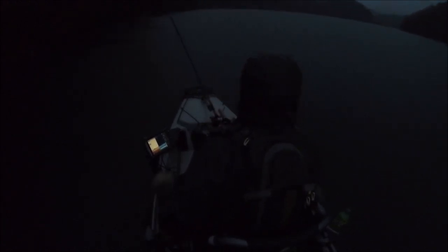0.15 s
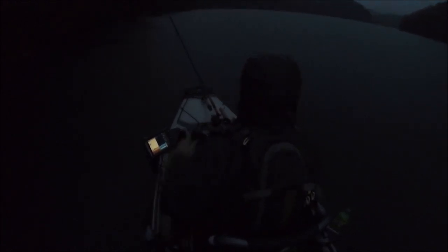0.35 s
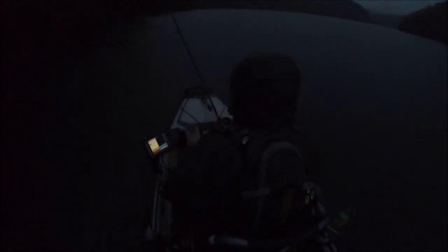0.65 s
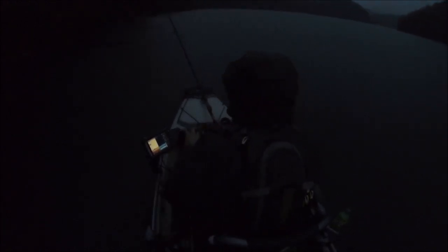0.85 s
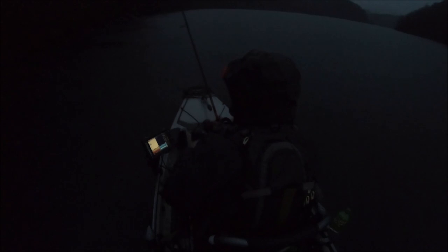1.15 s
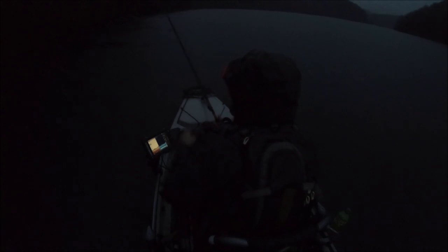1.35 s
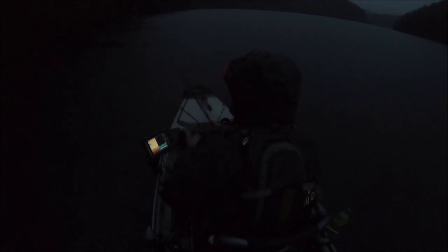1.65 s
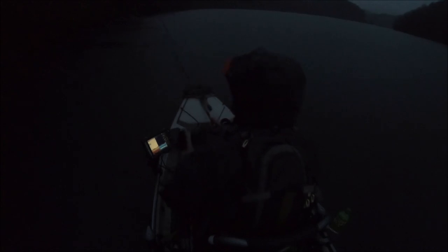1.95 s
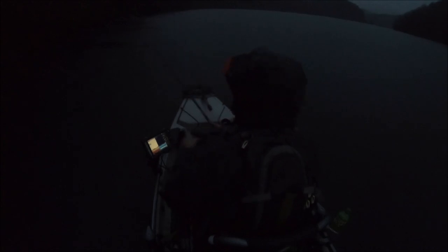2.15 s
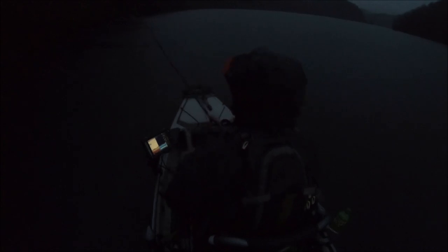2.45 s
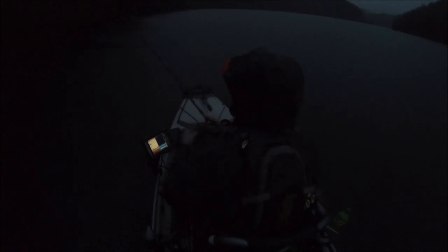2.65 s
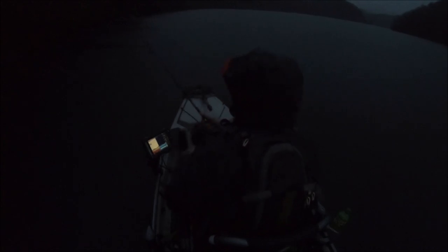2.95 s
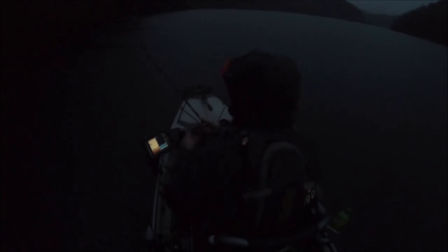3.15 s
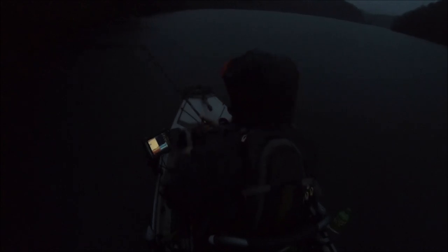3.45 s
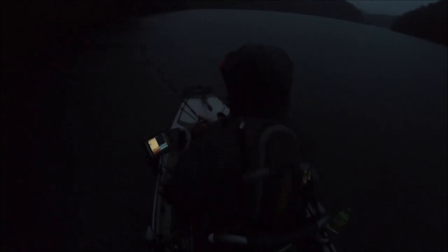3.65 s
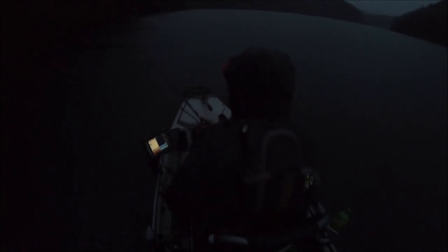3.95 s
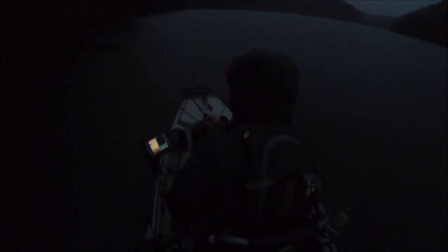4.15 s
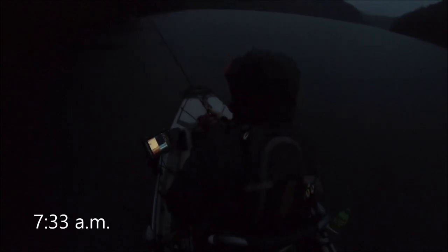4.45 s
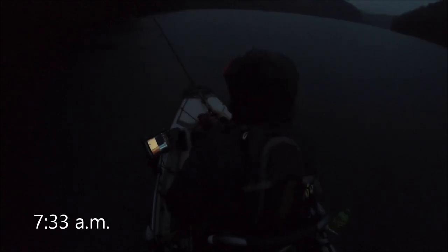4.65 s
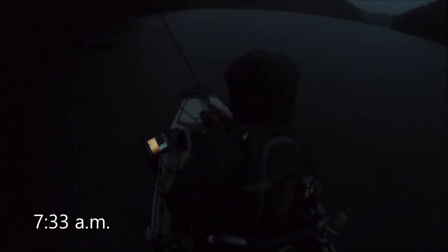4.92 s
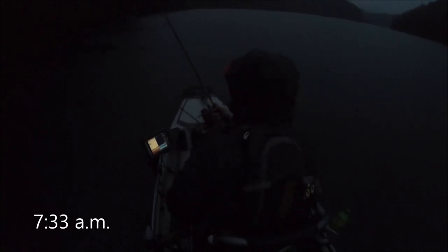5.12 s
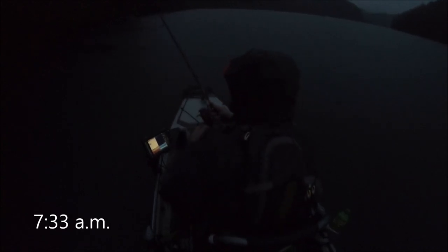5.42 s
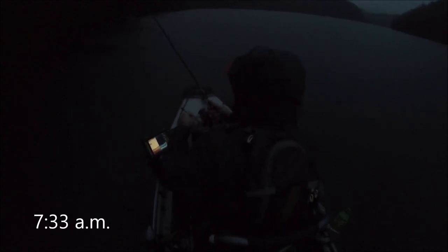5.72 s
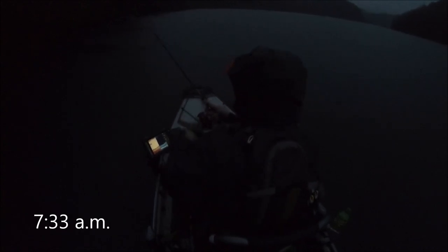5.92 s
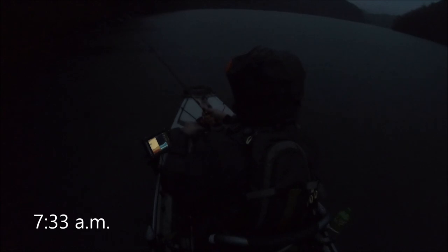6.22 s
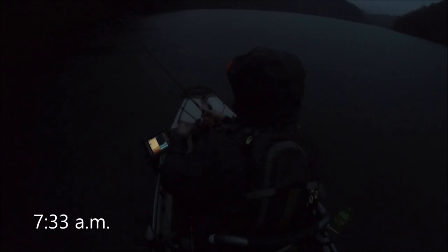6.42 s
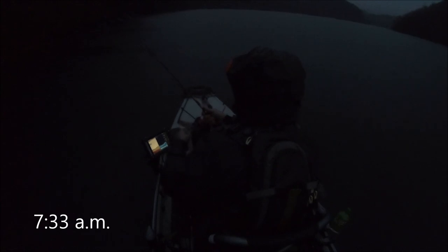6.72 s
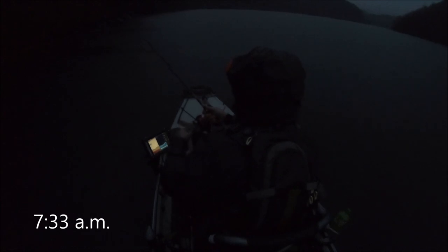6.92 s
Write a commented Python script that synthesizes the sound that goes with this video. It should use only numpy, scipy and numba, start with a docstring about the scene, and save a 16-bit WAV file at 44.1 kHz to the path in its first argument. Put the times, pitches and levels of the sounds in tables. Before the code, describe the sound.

Steady, gentle rain falls on a lake throughout, a soft wide hiss mixed with fine patter and countless tiny rising plips. The microphone is wrapped in plastic on a boat, so drops hitting the wrap sound extremely close, short and dry. A very loud smack comes at about 0.07 s; the rain is pushed down and creeps back. Crisp ticks and pops follow at 0.5, 0.8, 1.2 and 2.1 s, with lighter taps between. At 3.1 s another overloaded smack, heavier to the left, leaves a short low rumble. Small taps scatter until sharp pops at 5.1 to 5.3 s. The heaviest blow lands at 5.77 s, blunt and clipped, with a deep thump and faint dull stutters just ahead. More pops cluster at 6.1, 6.4 and 6.7 s, then rain alone recovers to 7 s. Faint hull bumps, bright spray clicks and occasional bubbles run underneath.

```python
"""Rain on a lake, under plastic wrap

Steady rain (noise bands, random drops, small bubbles) heard from a boat through the wrap around a camera.
Drops on the wrap are short blows that ring modes and splash; the three heaviest have a rumble after them;
faint dull copies, a recording artifact, stutter ahead.
Spray clicks, hull bumps and bubbles are short swelling sines.
Loud drops overload the recorder; its limiter ducks everything and lets the rain creep back.
"""
import sys
import numpy as np
from scipy import signal
from scipy.fft import rfft, irfft
from scipy.io import wavfile
from scipy.ndimage import uniform_filter1d
from numba import njit

SR = 44100
rng = np.random.default_rng(int(sys.argv[2]) if len(sys.argv) > 2 else 0)


def store_wav(level_fs):
    """Save 16-bit WAV to argv[1]."""
    pcm = np.round(np.clip(np.atleast_2d(level_fs), -1, 1) * 32767)
    wavfile.write(sys.argv[1], SR, pcm.T.astype(np.int16))


N = 312228

# All event peak levels are ahead of the limiter.
# Rain spectrum, relative: f/Hz, level/dB per Hz
RAIN_SPECTRUM = [(18, -46), (30, -10), (86, -30.5), (106, -36), (141, -5), (215, 0), (295, -3.5), (374, -2),
                 (520, -4), (866, -4), (1600, 0), (2980, -0.5), (4400, -10.5), (6380, -19), (8300, -20.5),
                 (10300, -27.5), (11800, -40), (14000, -43.5), (16000, -66)]
# Likeness of left and right rain: f/Hz, correlation/0-1
RAIN_LIKENESS = [(60, 0), (130, 0.6), (290, 0.92), (640, 0.9), (1410, 0.2), (3100, 0.89), (5000, 0.4),
                 (6800, 0), (15000, 0.3)]
# Separate drops in the rain: f/Hz, power share/0-1
PATTER_SHARE = [(100, 0.18), (300, 0.7), (1000, 0.3), (3000, 0.31), (8000, 0.9)]
# Quick level flicker of the rain: f/Hz, depth/dB
RAIN_FLICKER = [(100, 1.5), (1000, .8), (4000, 1), (8000, 1.7), (12000, 2.2)]
# Drops on the wrap: t/s, peak level/dB, main pitch f/Hz, treble gain/dB, left minus right/dB,
# bass gain/dB, right port delay/ms, blow width/cycles (floor 0.1), blow gain/dB, snap gain/dB,
# fall below main pitch/dB per octave, ring length/factor
WRAP_DROPS = [(0.0447, -21.5, 4000, -31, -1.5, -41, -0.024, 1, 7, -2, 6, 1),
              (0.0668, 26.5, 1022, -47, -2, -16, -0.12, 0.55, 7.5, 3, 3, 0.97),
              (.087, -27, 3300, -20, -2, -35, .02, 0.24, 11, -8, -3, 1.3),
              (0.5257, -11.5, 2960, -11, -6, -39, 0.05, 0.33, 4.5, 11, 9, 0.37),
              (0.6952, -27.5, 2840, -17, -3.5, -35, 0, 0.49, 7.5, 12, 15, 1.3),
              (0.767, -30, 2460, -35, -2, -32, .02, 0.57, 10, -3, 11, 1.2),
              (0.8291, -3, 1237, -32.5, 2, -31.5, 0.47, 0.36, 4, -3.5, 14, 0.92),
              (1.1066, -26, 2930, -21.5, 2, -37, 0, 0.31, 13, 4, 18, 1.1),
              (1.1578, -32, 2200, -33, 1, -35, 0.052, .26, 11, -2, 8, 1.1),
              (1.1874, 2.5, 2120, -22.5, -6, -45, -0.29, 0.42, 8, -11, 17, 0.88),
              (1.665, -25, 1780, -29, 11, -34, 0.21, 0.36, 13, -2, 0, 1.1),
              (1.825, -41, 2350, -23, -6, -32, .02, .3, 4, 0, 8, 1.1),
              (2.072, -4, 2200, -23, 0.5, -27, -0.14, 0.34, 13, 7, 6.5, 1),
              (2.1784, -34, 2120, -32, -7, -30, 0.16, .25, -4, 0, 8, 1.1),
              (2.4026, -28.5, 690, -21, -0.5, -23, 0, .3, -4, 0, 19, 0.81),
              (2.8745, -19.5, 3050, -10, -5.5, -38, -0.051, 0.17, 0.5, 11, 10, 0.88),
              (2.9155, -25, 563, -21, 1, -28, 0.4, 0.39, 5, -5, 8, 1.2),
              (2.9738, -28.5, 2720, -24, 3, -28, 0.02, .3, -2, 6, 8, 1.6),
              (3.1102, 30, 930, -58, 12, -17.5, -0.35, 0.44, 9.5, -3.5, 20, 0.86),
              (3.135, -31, 3510, -25, 3, -36, .02, 0.28, 8, -1, 8, 0.81),
              (3.1585, -23, 1483, -30, 9, -30, 0.11, 0.19, 10, -1, 6, .9),
              (3.2846, -23, 1275, -25, -3.5, -22, -0.048, 0.29, 2, 6.5, 2, 1.3),
              (3.451, -40.5, 1320, -20.5, 2, -25, 0.11, 0.13, 8, -4, -2, 0.64),
              (3.9583, -27, 2800, -14, -4, -21, -0.02, 0.42, 5, 6, 8, 0.92),
              (4.046, -30.5, 2770, -25, -15, -31, 0.047, .3, 2, 10, 12, 1.1),
              (4.3764, -33, 2820, -34, -3, -33, .02, 0.43, -4, 4, 13, 1.7),
              (4.588, -42, 2620, -24, 3, -23, 0.33, 0.25, 12, 0, 8, 1.1),
              (4.767, -33, 1163, -36, -3, -21, .02, 0.68, 7, -4, 8, 1.4),
              (4.914, -35, 2480, -25, 1, -38, 0.018, .23, 11, -3, 8, 1),
              (5.1161, -12, 2430, -10.5, -0.5, -38, 0, 0.073, 4, 7, 7, 0.89),
              (5.1695, -23, 1680, -21, 3, -19, 0.079, 1, 8.5, 2, 2.5, 1.3),
              (5.1998, -30, 830, -13, -1, -33, 0, 0.51, 15, 11, 8, 1.1),
              (5.2455, 3, 1487, -29.5, 6.5, -23.5, -0.32, 0.31, -1, -20.5, 3.5, 0.66),
              (5.3397, 3, 1483, -30, 8.5, -30.5, 0.33, 0.39, 11.5, -12.5, 18, 1.17),
              (5.4362, -29, 3200, -36, 1, -28, 0.012, 0.35, 11, -3, 8, 1.1),
              (5.768, 45, 713, -69, 9.5, -8, -0.24, 0.42, 12, -8, -3.5, 1.14),
              (6.0935, -4, 1650, -27.5, 6, -37, -0.084, 0.28, -1, -10, 8.5, 1.04),
              (6.3642, 4.5, 498, -43.5, 6, -16.5, -0.24, 0.47, 5.5, -6, 12.5, 0.75),
              (6.3895, 0.5, 1460, -31, 9, -36, 0.43, 0.37, 6, -4.5, 14, 1.3),
              (6.422, -17, 786, -38, -7, -18, -0.65, 0.21, 12.5, -14, 7, 1.6),
              (6.7136, -13.5, 1488, -31, 17, -34, -0.063, 0.35, 8, -4, 9, 0.94)]
# Modes of wrap and housing, before each drop's retuning and scaling: f/Hz, level/dB, t60/s
WRAP_MODES = [(151, 9, 0.037), (345, 5, 0.032), (508, -1.5, 0.014), (806.5, 2, 0.012),
              (1008.5, -2.5, 0.003), (1341.3, -2, 0.0097), (1650, -0.5, 0.007), (2139, 0, 0.007),
              (2782, -2.5, 0.0053), (3200, -5.5, 0.002), (4000, -11.5, 0.0065), (5000, 14, 0.00084),
              (6880, 5.5, 0.0024), (8650, 6.5, 0.0028), (11000, -25, .003), (14060, -30.5, .002)]
# Bumps through the hull: t/s, peak level/dB before panning, f/Hz, swell/cycles
HULL_BUMPS = [(0.248, -33, 383, 0.26), (0.3137, -43.5, 314, 0.95), (0.6676, -47, 423, 0.91),
              (.799, -43, 330, 0.95), (1.158, -40, 840, 0.85), (1.397, -40, 367, 0.79),
              (2.021, -47, 398, 0.88), (2.152, -46, 370, .8), (2.3023, -31.5, 278, 0.186),
              (2.979, -44, 370, 1), (3.025, -41.5, 530, 1), (3.4855, -42, 325, 0.71),
              (3.556, -40, 715, 0.83), (3.985, -47.5, 320, 0.65), (4.247, -46.5, 300, 0.97),
              (4.68, -51, 364, 0.85), (4.931, -40, 560, 0.55), (5.502, -44.5, 560, 0.47),
              (5.6797, -41, 367, 0.51), (6.232, -43, 316, 0.89)]
# Spray on nearby gear: t/s, peak level/dB before panning, f/Hz
GEAR_SPRAY = [(.356, -54, 6860), (0.445, -40, 4580), (.722, -57, 7800), (.8116, -61, 6000),
              (.926, -50, 7580), (1.085, -52, 7000), (1.405, -56, 8200), (1.7554, -50, 5500),
              (1.784, -46, 7600), (1.952, -36, 8140), (2.3111, -54, 6000), (2.5154, -47, 8180),
              (3.8028, -60.5, 8700), (3.885, -53, 8150), (3.957, -55, 8200), (4.0791, -38.5, 7700),
              (4.2476, -44.5, 7300), (4.351, -45, 4500), (4.592, -48, 6360), (4.844, -52, 10300),
              (4.9968, -47, 5800), (5.1473, -47, 8400), (5.3136, -39, 4640), (5.366, -54, 4300),
              (5.574, -52, 5400), (7.0396, -48, 6500)]
# Bubbles in the water: t/s, peak level/dB, initial f/Hz, swell/cycles, glide/share (final rise is twice this)
LAKE_BUBBLES = [(0.611, -37, 1570, 3.5, 0.074), (1.652, -43, 1760, 4.2, 0.074), (1.698, -45, 2800, 6, .08),
                (1.912, -47, 4200, 11, .08), (5.535, -43.5, 2160, 5.5, 0.08), (6.106, -46, 873, 5.9, 0.56)]

RAIN_RMS_DB, RAIN_RIGHT_DB = -48.5, 0.92  # right gain is on top
PLIP_DB, PLIP_HZ, PLIP_CYCLES = -53, 2702, 5
BASS_HZ, SNAP_HZ, TREBLE_HZ = 400, 2300, 4500  # mode group edges
SLOPE_DB_PER_OCT, SLOPE_PER_DB = 1, 0.01  # fall above main pitch; drops over 0 dB are duller
BASS_PAN_DB, LOW_CUT_HZ = 4, 150
LEAD_CYCLES = 2  # the dent builds up before the modes ring
SPLASH_HZ, SPLASH_OCTAVES = 1200, 3.6
HEAVY_DB, JOLT_FROM_DB, JOLT_DB = 10, 35, -24.5
STUTTER_S, STUTTER_DB, STUTTER_STEP_DB = 0.0107, -45.5, -12
BUMP_PAN_DB, FAINT_BUMP_DB, FAINT_BUMP_HZ = 2.5, -49, 310
SPRAY_PAN_DB = -12.5
RUMBLE_CUT_HZ, TOP_HZ = 42, 16200


def undb(db):
    """dB to amplitude factor."""
    return 10 ** (np.asarray(db) / 20)


def unit(x):
    """Scale to unit RMS."""
    return x / np.sqrt(np.mean(x ** 2))


def over_hz(table, hz):
    """Read a (f/Hz, value) table on a log-frequency axis."""
    table_hz, value = np.array(table).T[:2]
    return np.interp(np.log(hz), np.log(table_hz), value)


def highpass(x, hz):
    """Second-order low cut."""
    return signal.sosfilt(signal.butter(2, hz, "high", fs=SR, output="sos"), x)


def band(x, hz, octaves):
    """Band-pass around a centre."""
    edges_hz = hz * 2. ** (np.array([-octaves, octaves]) / 2)
    edges_hz = np.minimum(edges_hz, .45 * SR)
    return signal.sosfilt(signal.butter(2, edges_hz, "band", fs=SR, output="sos"), x)


def walk(rate_hz):
    """Random levels held 1 / rate_hz s and slewed twice; spread near 1."""
    k = int(SR / rate_hz)
    steps = np.repeat(rng.standard_normal(N // k + 1), k)
    return 1.3 * uniform_filter1d(uniform_filter1d(steps, k), k)[:N]


def add(out, s, sound, db, pan_db):
    """Place a two-channel sound at s, peak-normalised to db, then panned."""
    i = int(s * SR)
    sound = sound[:, :N - i] / np.abs(sound).max()
    side_db = np.array([[pan_db], [-pan_db]]) / 2
    out[:, i:i + sound.shape[1]] += sound * undb(db + side_db)


def grain(hz, cycles, glide=0):
    """Sine whose envelope peaks after `cycles` cycles, then dies; glide raises the pitch as it goes."""
    u = np.arange(int(8 * cycles * SR / hz)) * hz / SR
    envelope = u / cycles * np.exp(-u / cycles)
    tone = np.sin(2 * np.pi * u * (1 + glide * u / (8 * cycles)))
    return np.tile(envelope * tone, (2, 1))


def faint(db, hz, count, spread_db=3, spread_octaves=0.31):
    """Weak events at random moments: rows of t/s, peak level/dB, f/Hz."""
    place = rng.random(count)
    level, pitch = rng.standard_normal((count, 2)).T
    return np.transpose([place * (N - 1) / SR, db + spread_db * level, hz * 2 ** (spread_octaves * pitch)])


def patter(per_s, spread_db, most=12000):
    """Impulses of random moment and size; independent signs in the two rows, used as mid and side."""
    place, keep = rng.random(most), rng.random(most)
    size, sign = rng.standard_normal(most), rng.standard_normal((2, most))
    out = np.zeros((2, N))
    kept = keep < per_s * N / SR / most
    out[:, (place * N).astype(int)] = sign * undb(spread_db * size) * kept
    return unit(out)


def rain(drops_per_s_at_2khz=900, spread_db=4):
    """Half-octave bands of hiss plus separate drops; neighbouring bands share their drops."""
    out, swell = 0, walk(0.31)
    f = np.arange(N // 2 + 1) * SR / N + 1
    spectrum = undb(over_hz(RAIN_SPECTRUM, f))
    for count, hz in enumerate(32 * 2 ** np.arange(0, 9.1, .5)):
        if count % 4 == 0:
            hiss = rfft(rng.standard_normal((2, N)))
            # low thuds are rarer than high ticks
            drops = rfft(patter(drops_per_s_at_2khz * (hz / 2000) ** .4, spread_db))
            flicker = walk(22)
        share = np.clip(over_hz(PATTER_SHARE, hz), 0, 1)
        alike = np.clip(over_hz(RAIN_LIKENESS, hz), 0, 1)
        # neighbouring windows add up to one
        window = np.cos(np.pi * np.clip(np.log2(f / hz), -.5, .5)) ** 2
        mix = np.sqrt(1 - share) * hiss + np.sqrt(share) * drops
        mid, side = irfft(mix * window * spectrum, N)
        flutter = undb(0.27 * swell + over_hz(RAIN_FLICKER, hz) * flicker)
        stereo = np.sqrt(1 + alike) * mid + np.sqrt(1 - alike) * side * np.array([[1], [-1]])
        out = out + flutter * stereo
    return unit(out) * undb(RAIN_RMS_DB + np.array([[0], [RAIN_RIGHT_DB]]))


def plips():
    """Countless small bubbles on the lake: faint rising sines, randomly panned."""
    out = np.zeros((2, N))
    events = faint(PLIP_DB, PLIP_HZ, count=500, spread_octaves=.35)
    for (s, db, hz), pan in zip(events, rng.standard_normal(500)):
        add(out, s, grain(hz, PLIP_CYCLES, 0.13), db, 4 * pan)
    return out


def drop(hz, treble_db, pan_db, bass_db, lag_ms, width, blow_db, snap_db, under_db, length, slope_db,
         slack=0.027, scatter_db=1.2, push_cycles=1.08, splash_db=-24, splash_t60_s=0.03):
    """A blow dents the wrap, rings modes near its pitch and splashes; the bending wave reaches one port first."""
    f, db, t60 = np.transpose(WRAP_MODES)[:, :, None]
    early = np.arange(3000) / SR - LEAD_CYCLES / hz
    t = np.maximum(early, 0)

    middle = (f > BASS_HZ) & (f < TREBLE_HZ)
    fall_db = np.where(f > hz, slope_db, under_db) * np.abs(np.log2(f / hz))
    outer_db = np.where(f < BASS_HZ, bass_db, treble_db)
    db = db + np.where(middle, -fall_db, outer_db)
    db = db + snap_db * (middle & (f > SNAP_HZ))  # a taut spot snaps more brightly

    # the loose wrap is tuned by where it is hit
    nearest_hz = f[np.argmin(np.abs(np.log(f / hz)))]
    tension = np.where(middle & (f < SNAP_HZ), hz / nearest_hz, 1)
    shift, *scatter, turn = rng.standard_normal((len(WRAP_MODES), 4)).T[:, :, None]
    mode_hz = f * tension * (1 + slack * shift)
    # neighbouring modes swing in opposite senses, which fills the gaps between them
    sense = (-1.) ** np.arange(len(WRAP_MODES))[:, None]

    splash = band(rng.standard_normal((2, len(t))), SPLASH_HZ, SPLASH_OCTAVES)
    splash = splash * np.exp(-np.log(1000) * t / splash_t60_s)
    sound = []
    for side, own, spatter in zip((1, -1), scatter, splash):
        delay_s = max(-side * lag_ms, 0) / 1000
        late = np.maximum(t - delay_s, 0)
        u = np.where(f > BASS_HZ, late, t)  # the housing carries the bass the same way for every drop
        side_db = side * np.where(f > BASS_HZ, pan_db, BASS_PAN_DB) / 2
        decay = np.exp(-np.log(1000) * np.maximum(u - push_cycles / hz, 0) / (t60 * max(length, .3)))
        phase = 0.37 * side * turn * (f > BASS_HZ)
        ring = sense * decay * np.sin(2 * np.pi * mode_hz * u + phase)
        modes = np.sum(undb(db + side_db + scatter_db * own) * ring, axis=0)
        rise = np.minimum(late * hz / push_cycles, 1) ** 2  # the water spreads over about a cycle
        cycle = (early - delay_s) * hz - push_cycles
        blow = -np.exp(-(cycle / max(width, .1)) ** 2 / 2) * np.cos(2 * np.pi * cycle)
        wet = rise * (modes + undb(splash_db) * spatter)
        sound.append(wet + undb(blow_db + side * pan_db / 2) * blow)
    return highpass(sound, LOW_CUT_HZ)


def stutter_ahead(out, start_s, sound, db):
    """Recording artifact: faint dull copies at even steps ahead of a heavy drop."""
    dull = band(band(sound, 760, 1.1), 760, 1.1)
    dull = dull + undb(2) * band(sound, 170, 1.4) + undb(-3) * band(sound, 380, 1.0)
    dull /= np.abs(dull).max(axis=1, keepdims=True)  # as strong left as right
    for k in range(4):
        ahead_s = .0008 + (k + 1) * STUTTER_S
        add(out, start_s - ahead_s, dull, db + STUTTER_DB + k * STUTTER_STEP_DB, 0)


def heavy_rumble(out, s, db, rumble_db=-62, rumble_t60_s=0.36):
    """A low band of decaying noise follows a heavy drop."""
    t = np.arange(SR // 2) / SR
    rumble = band(rng.standard_normal(len(t)), 200, 0.85) * np.exp(-np.log(1000) * t / rumble_t60_s)
    add(out, s, np.tile(rumble, (2, 1)), db + rumble_db, 0)


def mount_jolt(out, s, after_db=28):
    """The heaviest drop jolts the mount: two low swells start ahead of it, a deeper, louder one with it."""
    add(out, s - .017, grain(77.0, cycles=0.94), JOLT_DB, 18)
    add(out, s - .012, grain(140, cycles=1.5), JOLT_DB + 10, 4)
    add(out, s, grain(44, cycles=0.51), JOLT_DB + after_db, 18)


def wrap():
    """All listed drops on the wrap; heavy ones with stutter and rumble, the heaviest with the jolt."""
    out = np.zeros((2, N))
    for s, db, hz, *colour in WRAP_DROPS:
        slope_db = SLOPE_DB_PER_OCT + SLOPE_PER_DB * max(db, 0)
        sound = drop(hz, *colour, slope_db)
        start_s = s - LEAD_CYCLES / hz
        add(out, start_s, sound, db, 0)
        if db > HEAVY_DB:
            stutter_ahead(out, start_s, sound, db)
            heavy_rumble(out, s, db)
        if db > JOLT_FROM_DB:
            mount_jolt(out, s)
    return out


def bumps():
    """Soft thuds through the hull: low sines swelling within a cycle, plus faint random ones."""
    out = np.zeros((2, N))
    for s, db, hz, cycles in HULL_BUMPS:
        add(out, s, grain(hz, cycles), db, BUMP_PAN_DB)
    for s, db, hz in faint(FAINT_BUMP_DB, FAINT_BUMP_HZ, count=30):
        add(out, s, grain(hz, cycles=0.7), db, 0)
    return out


def spray():
    """Fine spray on nearby gear: bright clicks, short sines narrowed to an octave."""
    out = np.zeros((2, N))
    for s, db, hz in GEAR_SPRAY:
        add(out, s, band(grain(hz, cycles=1.6), hz, 1.0), db, SPRAY_PAN_DB)
    return out


def bubbles():
    """Bubbles in the water: swelling sines whose pitch rises as they go."""
    out = np.zeros((2, N))
    for s, db, hz, cycles, glide in LAKE_BUBBLES:
        add(out, s, grain(hz, cycles, glide), db, 0)
    return out


def scene():
    """Sum of all sources."""
    return rain() + plips() + wrap() + bumps() + spray() + bubbles()


@njit
def limiter_db(over_db, attack, quick, slow, share):
    """Gain cut/dB: chases the overload fast, returns at a steady rate, and a share of it lingers."""
    cut, fast, rest = np.empty(len(over_db)), 0., 0.
    for i in range(len(over_db)):
        if over_db[i] > fast:
            fast = fast + attack * (over_db[i] - fast)
        else:
            fast = max(fast - quick, 0.)
        rest = max(rest - slow, share * fast)
        cut[i] = max(fast, rest)
    return cut


def record(dry, knee_db=-13, attack_s=0.00088, ahead_s=0.00039, quick_db_s=125, slow_db_s=7.5,
           linger=0.3, ceiling=0.716):
    """Limiter on the louder channel with slight look-ahead; the excess clips; lowest bass and top are cut."""
    over_db = 20 * np.log10(np.abs(dry).max(axis=0) + 1e-9) - knee_db
    attack = 1 - np.exp(-1 / (attack_s * SR))
    cut_db = limiter_db(over_db, attack, quick_db_s / SR, slow_db_s / SR, linger)
    cut_db = np.interp(np.arange(N) + ahead_s * SR, np.arange(N), cut_db)
    held = np.clip(dry * undb(-cut_db), -ceiling, ceiling)
    held = highpass(held, RUMBLE_CUT_HZ)
    return signal.sosfilt(signal.ellip(8, .2, 70, TOP_HZ, fs=SR, output="sos"), held)


dry = scene()
out = record(dry)
store_wav(out)
```